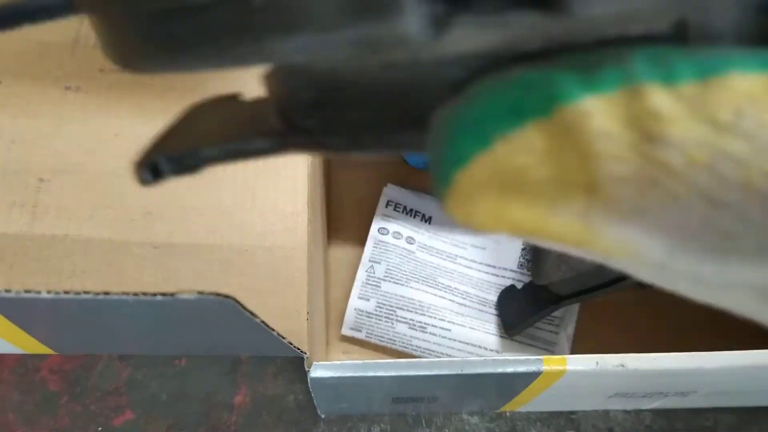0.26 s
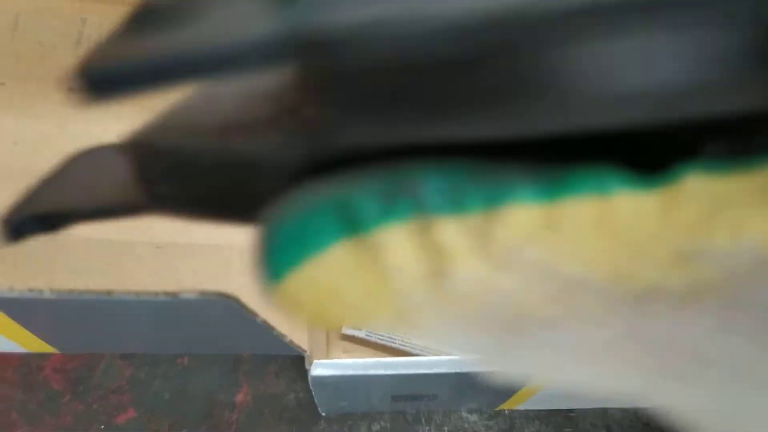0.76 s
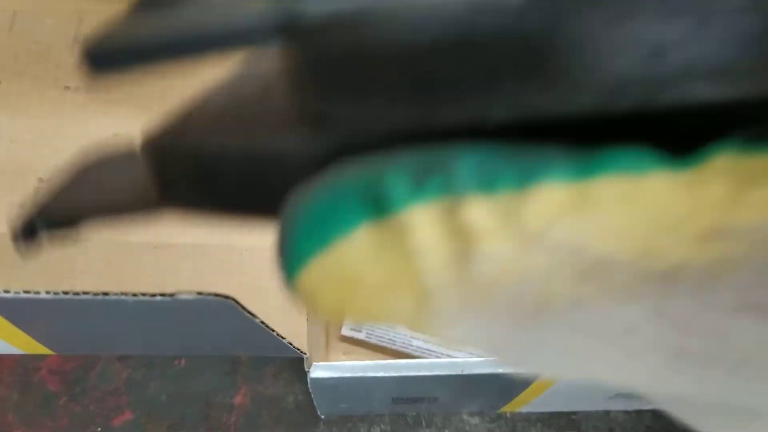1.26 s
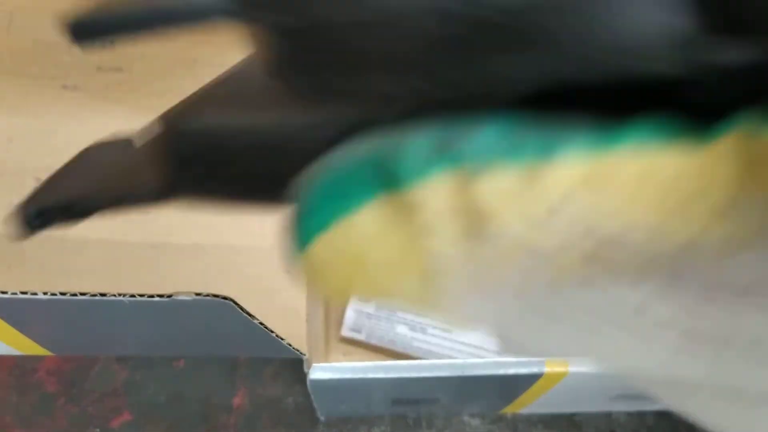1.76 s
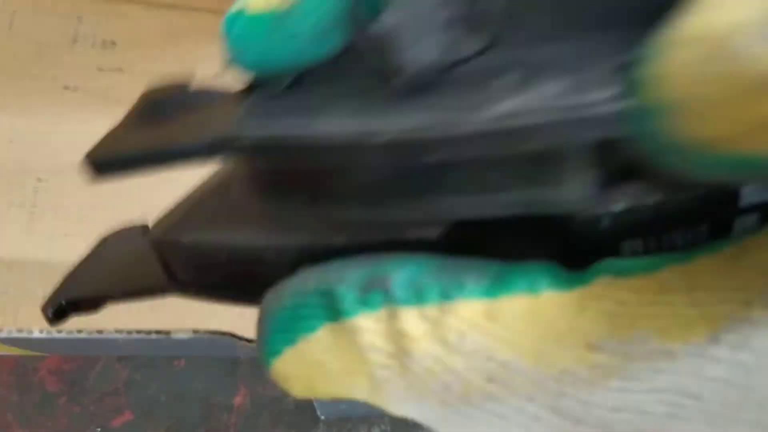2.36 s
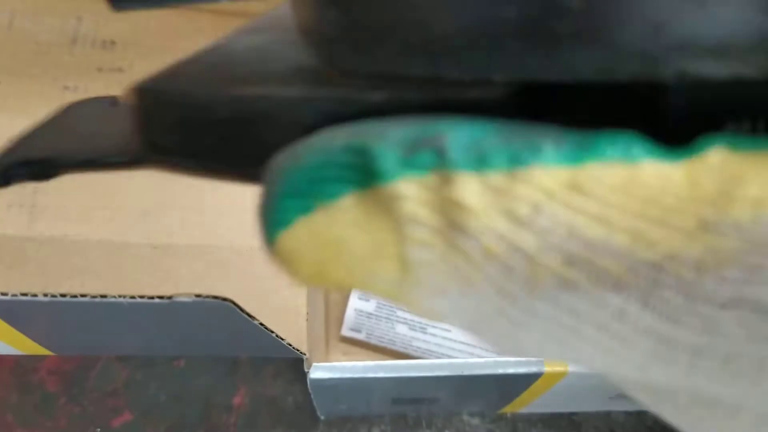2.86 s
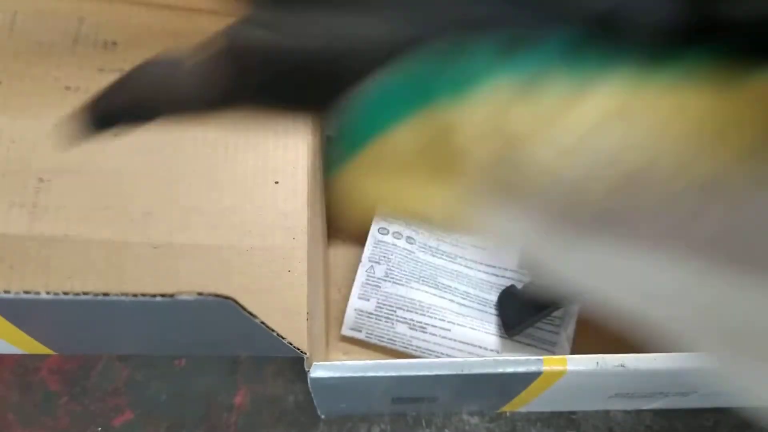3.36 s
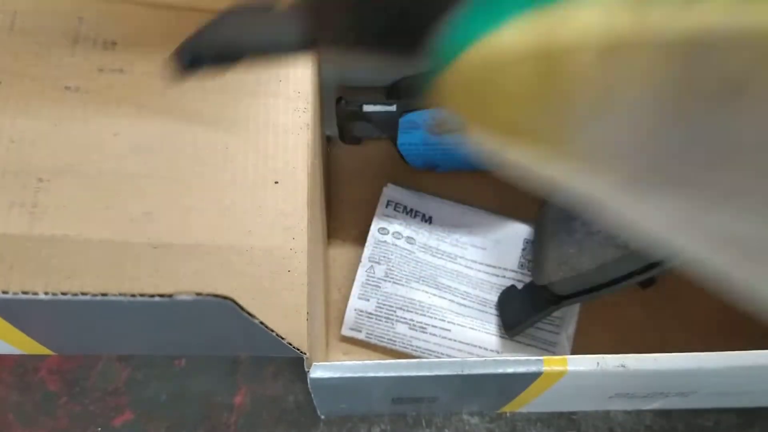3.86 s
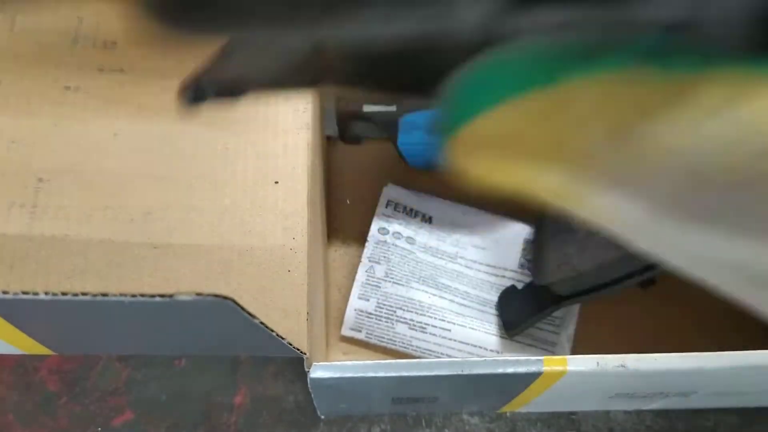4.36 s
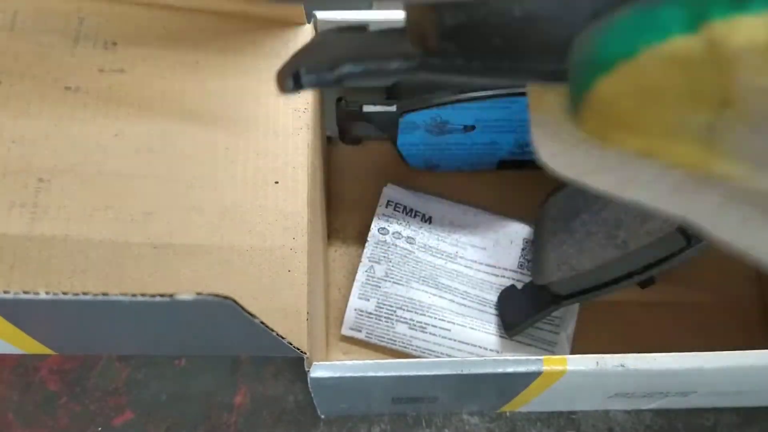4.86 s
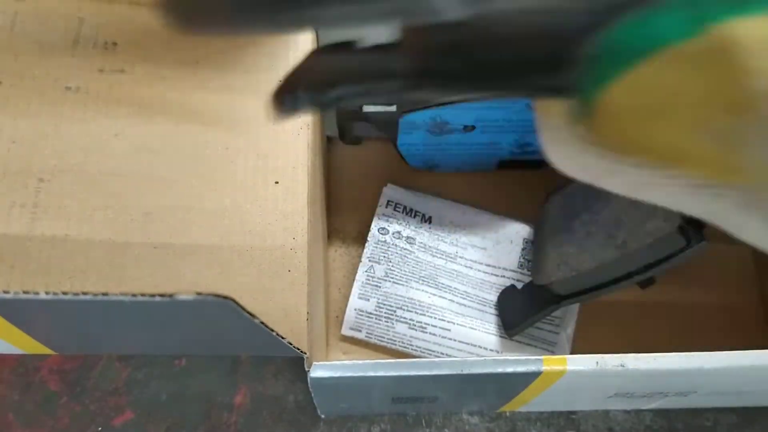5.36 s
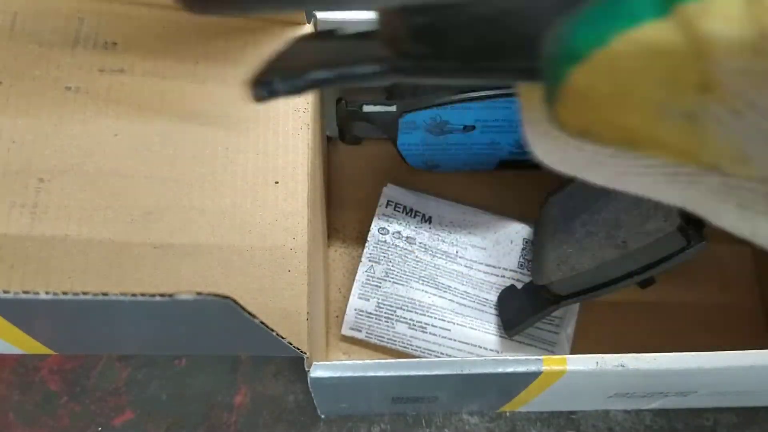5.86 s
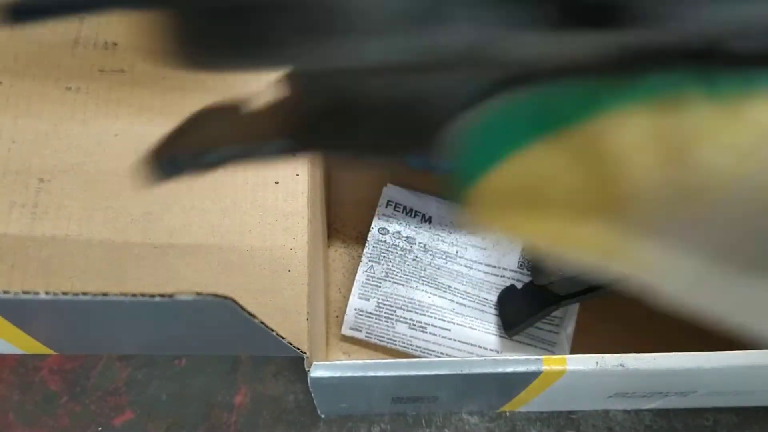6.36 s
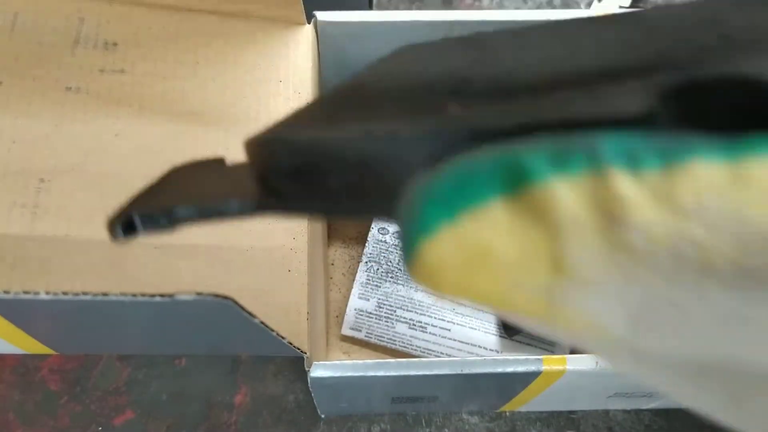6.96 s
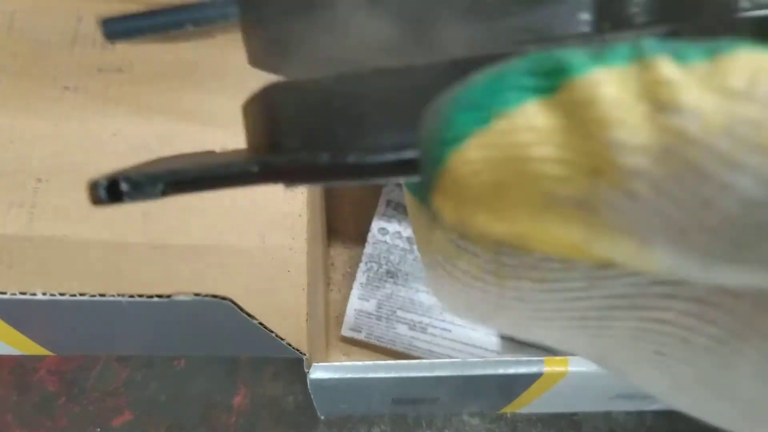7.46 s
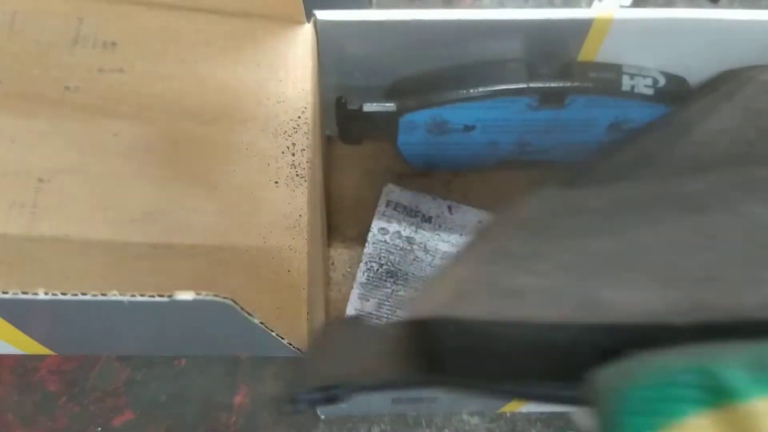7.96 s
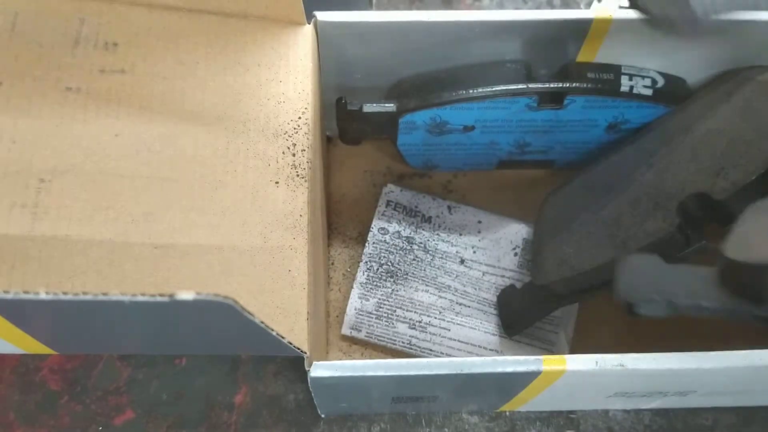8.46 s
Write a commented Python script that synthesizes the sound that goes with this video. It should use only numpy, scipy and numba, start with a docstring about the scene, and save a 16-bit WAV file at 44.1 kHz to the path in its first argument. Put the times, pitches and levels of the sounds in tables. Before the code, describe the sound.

In a quiet, hard-walled workshop, a dry, rapid scraping runs in a steady rhythm as two brake pads are ground against each other right by the microphone. After about fifty strokes it weakens and stops. The pads then clack together three times, each hit sharp and crunchy with a brief ring and a little room echo. Gloves rustle softly with a few small ticks at the end, over faint room noise.

```python
"""Over the air of a hard-walled workshop and distant engine drones, two brake pads are rubbed face to
face close to a pair of microphone ports; friction drives their resonances in quick strokes. At 2.4 s a
brushed cardboard box groans by stick-slip, and at 5.9 s a thin whine sets in. The rubbing ends, gloves
rustle and tick, and from 7 s the pads are knocked together three times to shake the dust off: impacts
excite their modes, the room reverberates, a limiter holds the peaks down. Last, the gloves rustle again."""
import sys
import numpy as np
from scipy import signal
from scipy.fft import rfft, irfft
from scipy.io import wavfile
from numba import njit

SR = 44100
rng = np.random.default_rng(int(sys.argv[2]) if len(sys.argv) > 2 else 0)


def store_pcm(level_fs):
    """Save levels as 16-bit WAV."""
    pcm = np.round(np.clip(level_fs, -1, 1) * 32767).astype(np.int16)
    wavfile.write(sys.argv[1], SR, np.atleast_2d(pcm).T)


N = 383211
RIGHT_LEAD_S = 0.000103   # sound from the pads reaches the right port first


def from_db(db):
    """Amplitude ratio of a level in dB."""
    return 10 ** (np.asarray(db) / 20)


def rms_one(x):
    """Normalisation to rms 1."""
    return x / np.sqrt(np.mean(x ** 2) + 1e-20)


def envelope(rows):
    """Linear interpolation of (time, level) rows, and a gate that fades out beyond their ends."""
    times, levels_db = np.transpose(rows)
    t = np.arange(N) / SR
    gate = np.clip(np.minimum(t - times[0], times[-1] - t) / 0.02163 + 1, 0, 1)
    return np.interp(t, times, levels_db), gate


def coloured(x, points):
    """Spectral shaping by (frequency, level) points; rms 1."""
    hz, db = np.transpose(points)
    log_hz = np.log(np.arange(N // 2 + 1) * SR / N + 1)
    return rms_one(irfft(rfft(x) * from_db(np.interp(log_hz, np.log(hz), db)), N))


def resonance(x, hz, width_hz):
    """Two-pole resonator with unit peak gain."""
    r = np.exp(-np.pi * width_hz / SR)
    poles = [1, -2 * r * np.cos(2 * np.pi * hz / SR), r * r]
    return signal.lfilter((1 - r * r) / 2 * np.array([1, 0, -1]), poles, x)


@njit
def sliding_resonance(x, hz, width_hz):
    """Two-pole resonator with a time-varying centre frequency."""
    r = np.exp(-np.pi * width_hz / SR)
    y = np.zeros_like(x)
    for i in range(2, x.shape[1]):
        pull = 2 * r * np.cos(2 * np.pi / SR * hz[i])
        for c in range(x.shape[0]):
            y[c, i] = (1 - r * r) / 2 * (x[c, i] - x[c, i - 2]) + pull * y[c, i - 1] - r * r * y[c, i - 2]
    return y


def band(x, low_hz, high_hz):
    """Band-pass filter."""
    return signal.sosfilt(signal.butter(2, [low_hz, high_hz], "band", fs=SR, output="sos"), x)


def grit(per_s, spread_db, channels):
    """Shot noise: random contacts of uneven size; rms 1."""
    size = from_db(spread_db * np.minimum(rng.exponential(1, (channels, N)), 4))
    sign = rng.choice([-1, 1], (channels, N))
    return rms_one(size * sign * (rng.random((channels, N)) < per_s / SR) + 1e-9)


def drift(corner_hz):
    """Low-pass noise of rms 1, drawn at every 16th sample."""
    r = np.exp(-2 * np.pi * corner_hz * 16 / SR)
    slow = rms_one(signal.lfilter([1], [1, -2 * r, r * r], rng.standard_normal(N // 16 + 2)))
    return np.interp(np.arange(N) / 16, np.arange(len(slow)), slow)


def flutter(corner_hz, depth_db):
    """Gain for random amplitude modulation."""
    return from_db(depth_db * drift(corner_hz))


def sides(pan_db):
    """Port gains for a level difference, left over right."""
    return from_db(np.array([[.5], [-.5]]) * pan_db)


# Spectrum of the workshop air: (frequency [Hz], relative spectral level [dB])
AIR_SPECTRUM = [(18, 1), (45, -8.5), (90, -15.5), (175, -9), (300, -13.5), (700, -22), (1500, -24.5),
                (4000, -30.5), (9000, -29), (16000, -52.5)]


def workshop_air():
    """Ambient noise, largely coherent between the ports at long wavelengths only."""
    noise = rng.standard_normal((3, N))
    common, own = noise[0], noise[1:]
    lowpass = signal.butter(1, 600, fs=SR, output="sos")
    air = signal.sosfilt(lowpass, common + 0.6 * own) + own - signal.sosfilt(lowpass, own)
    return from_db(-57) * sides(5.6) * coloured(air, AIR_SPECTRUM) * flutter(2.8, depth_db=2.0)


# Distant engines: (start [s], end [s], frequency [Hz], rms level at mid-swell [dB])
ENGINE_DRONES = [(.1, 3.1, 65, -70), (3.8, 5.7, 55.3, -64), (7.7, 8.34, 176.8, -73), (8.4, 8.9, 174.6, -63)]


def engines():
    """Amplitude-modulated tones: each drone swells, wavers and fades."""
    out, t = np.zeros(N), np.arange(N) / SR
    for start, end, hz, level_db in ENGINE_DRONES:
        swell = from_db(level_db) * np.sin(np.pi * np.clip((t - start) / (end - start), 0, 1))
        out += swell * flutter(6, depth_db=3.0) * np.sqrt(2) * np.sin(2 * np.pi * hz * t)
    return out


def whine(hz=700, level_db=-73.5, start_s=5.9, rise_s=0.12):
    """A faint pure tone, slightly modulated in amplitude, sets in late and stays."""
    t = np.arange(N) / SR
    onset = from_db(level_db) * np.clip((t - start_s) / rise_s, 0, 1)
    return onset * flutter(3, depth_db=1) * np.sqrt(2) * np.sin(2 * np.pi * hz * t)


# Reverberation bands, each ending at the next row: (lower edge [Hz], T60 [s], relative level [dB])
ROOM_BANDS = [(98, 0.25, -2), (710, 0.53, -3), (1980, 0.58, -9.5), (2750, 0.51, -1), (5160, 0.42, 0.5),
              (9330, 0.12, -10.5), (16110, .15, -8)]


def room(x, far_wall_s=0.15, spread_s=0.035, far_wall_db=4.0):
    """Diffuse reverberation decays exponentially by band; the far wall's reflection adds a late swell."""
    t, tail = np.arange(SR) / SR, 0
    for (low, t60, db), (high, *_) in zip(ROOM_BANDS, ROOM_BANDS[1:]):
        tail = tail + band(rng.standard_normal((2, SR)), low, high) * from_db(db - 60 * t / t60)
    build_up = 1 - np.exp(-(t / 0.002) ** 2)
    tail *= build_up * from_db(far_wall_db * np.exp(-((t - far_wall_s) / spread_s) ** 2))
    return signal.fftconvolve(x, tail / np.sqrt(np.sum(tail ** 2) / 2), axes=1)[:, :N]


# Envelope of the brush against the box: (time [s], level [dB])
BOX_ENVELOPE = [(2.345, -61), (2.365, -37), (2.395, -32.5), (2.41, -39), (2.43, -41.5), (2.47, -45),
                (2.5, -58)]
# Cardboard modes: (frequency [Hz], bandwidth [Hz], relative level [dB])
BOX_MODES = [(210, 27, -8), (400, 47, -1)]


def box():
    """Stick-slip excitation: uneven slips set two hollow cardboard modes groaning."""
    level_db, gate = envelope(BOX_ENVELOPE)
    slips = grit(per_s=920, spread_db=3.5, channels=2)
    slips[1] = 0.97 * slips[0] + 0.75 * slips[1]   # partly coherent at the two ports
    groan = sum(from_db(db) * rms_one(resonance(resonance(slips, hz, width), hz, 3 * width))
                for hz, width, db in BOX_MODES)
    return gate * from_db(level_db) * sides(7.0) * groan


# Glove movements, one envelope each: (time [s], level [dB])
RUSTLE_ENVELOPES = [
    [(6.74, -52), (6.8, -77), (6.87, -63), (6.93, -65), (7.01, -56)],
    [(7.95, -68), (8.06, -64), (8.12, -57.5), (8.2, -58), (8.3, -68), (8.42, -55.5), (8.48, -50),
     (8.53, -56), (8.6, -72), (8.69, -61)],
]
# Spectrum of the cloth: (frequency [Hz], relative spectral level [dB])
RUSTLE_SPECTRUM = [(1180, -58), (2000, -13), (3610, -9.5), (4300, -3.5), (4820, -20.5), (9170, -2.5),
                   (14700, -23), (16000, -35)]


def glove_rustle():
    """Cloth friction: many tiny contacts merge into shot noise."""
    cloth = grit(per_s=5100, spread_db=1.5, channels=2) * flutter(26, depth_db=2.5)
    hiss = coloured(cloth, RUSTLE_SPECTRUM)
    body = from_db(-9.0) * rms_one(band(cloth, 860, 1460)) * sides(7.7)
    movement = sum(gate * from_db(level_db) for level_db, gate in map(envelope, RUSTLE_ENVELOPES))
    return movement * (hiss + body)


# Ticks of glove and grit: (time [s], level [dB], frequency [Hz], thud relative to tick [dB])
GLOVE_TICKS = [(2.375, -43, 3400, -8), (6.804, -46, 8990, -9), (6.811, -41, 3450, 3), (6.838, -43, 3320, 0),
               (6.938, -41, 9180, -17), (7.237, -46, 10000, -21), (8.028, -52, 4640, -17),
               (8.141, -46, 4210, -21), (8.188, -42, 3860, -8), (8.477, -45, 9230, -12),
               (8.583, -42, 9390, -26)]


def glove_ticks():
    """Damped transients: a bright snap over a hollow thud that decays more slowly."""
    out, t = np.zeros((2, N)), np.arange(900) / SR
    for start, level_db, hz, thud_db in GLOVE_TICKS:
        noise = band(rng.standard_normal((2, len(t))), hz / 2, 1.35 * hz)
        snap = (np.sin(2 * np.pi * hz * t) + 1.4 * noise) * np.exp(-t / 0.0016)
        thud = rms_one(band(rng.standard_normal(len(t)), 380, 680)) * np.exp(-t / 0.0069)
        at = round(start * SR)
        out[:, at:at + len(t)] += from_db(level_db) * sides(3.6) * (snap + from_db(thud_db) * thud)
    return out


# Air pushed out between the faces: (time [s], left level [dB], right level [dB], rise time [s])
AIR_PUFFS = [(7.028, -12, -17, .014), (7.438, -22, -37, .013), (7.692, -34, -46, .012)]


def puffs(swing_hz=2.1, decay_s=0.12):
    """Air flow sucks at the ports; the membrane swings back slowly as a damped oscillator."""
    suction, t = np.zeros((2, N)), np.arange(N) / SR
    for start, left_db, right_db, rise_s in AIR_PUFFS:
        age = np.clip((t - start) / rise_s, 0, None)
        suction -= from_db([[left_db], [right_db]]) * age ** 2 * np.exp(2 - 2 * age)
    r = np.exp(-1 / (decay_s * SR))
    membrane = signal.lfilter([1, -2, 1], [1, -2 * r * np.cos(2 * np.pi * swing_hz / SR), r * r], suction)
    gust = rms_one(band(rng.standard_normal(N), 170, 380))
    return membrane + from_db(-16) * gust * suction * sides(12.0)


# Modes of the loose pads: (frequency [Hz], T60 [s])
FREE_MODES = [(390, 0.033), (640, 0.027), (1150, 0.013), (1830, 0.055), (1950, 0.11), (2260, 0.018),
              (2820, 0.015), (3520, .03), (4490, 0.02), (6700, .025), (8400, 0.018)]
# Spot struck by each knock: (level of each mode in turn [dB], ..., crunch level [dB])
STRIKE_SPOTS = [(-10, -5, -3, 2, -5, 7.5, 7, -4, -2, -14, -10, 21),
                (-26, -35.5, -21, -13, -1, -3, -2, -2, -12, -17, -28, 13.7),
                (-28, -25, -6, 2.5, -25, -11.5, 0.5, -4, -2, -14, -29, 8)]
# Rattle within the knocks: (time [s], knock index, strength [dB], contact time [s], snap level [dB])
CONTACTS = [(7.0245, 0, -16, .00003, -3), (7.0256, 0, -9, .00003, 3), (7.0286, 0, -13, .00008, -3),
            (7.0316, 0, -21, .00006, -12), (7.0362, 0, -27, .00002, -16), (7.4343, 1, -21, .00002, -10),
            (7.4352, 1, -9, .00003, 6), (7.4374, 1, -13, .00004, 5), (7.6851, 2, -3, .00012, -16),
            (7.6883, 2, -2, .00008, -5), (7.6931, 2, -5, .00004, -6), (7.7045, 2, -21, .00003, -28)]


def knocks(snap_s=0.00007):
    """Impacts excite free vibration; longer contacts stir the highs less. One stereo signal per knock."""
    out, t = np.zeros((len(STRIKE_SPOTS), 2, N)), np.arange(4096) / SR
    age = np.clip(t - [[RIGHT_LEAD_S], [0]], 0, None)
    pressure_snap = age / snap_s * (2 - age / snap_s) * np.exp(-age / snap_s)
    for start, knock, strength_db, contact_s, snap_db in CONTACTS:
        *levels_db, crunch_db = STRIKE_SPOTS[knock]
        ring = sum((-1) ** k * from_db(level_db - 60 * age / t60) * np.sin(2 * np.pi * hz * age)
                   for k, ((hz, t60), level_db) in enumerate(zip(FREE_MODES, levels_db)))
        grains = rng.standard_normal((2, len(t))) * np.exp(-t / 0.0025)
        settling = 0.33 * np.exp(-t / 0.01) * band(rng.standard_normal((2, len(t))), 1800, 9000)
        # crushed grit rings the touching faces, at twice their bandwidth in rubbing
        crunch = sum((-1) ** k * from_db(max(db)) * resonance(grains + settling, hz, 2 * width)
                     for k, (hz, width, *db) in enumerate(PRESSED_MODES))
        r = np.exp(-1 / (contact_s * SR))   # the contact time acts as a low-pass
        ring = signal.lfilter([(1 - r) ** 2], [1, -2 * r, r * r], ring)
        crunch = from_db(crunch_db) * signal.lfilter([1 - r], [1, -r], crunch)
        impact = from_db(strength_db) * (ring + crunch) + from_db(snap_db) * pressure_snap
        at = round(start * SR)
        out[knock, :, at:at + len(t)] += impact
    return out


# Rubbing strokes: (start [s], duration [s], relative level [dB], swell from start to end [dB])
PAD_STROKES = [(0.025, 0.11, -35.5, 6.5), (0.178, 0.094, -34.5, 1), (0.324, 0.098, -37, 6),
               (0.468, 0.1, -34.5, 0), (0.61, 0.11, -34, 2), (0.766, 0.097, -32.5, 0),
               (0.899, 0.1, -34.5, 6), (1.044, 0.1, -31, 0), (1.173, 0.11, -34, 3.5),
               (1.319, 0.088, -34.5, -2), (1.453, 0.088, -36, 1), (1.585, 0.087, -36, -4),
               (1.717, 0.092, -36, 1), (1.848, 0.09, -34.5, 2), (1.984, 0.096, -36.5, 1),
               (2.122, 0.091, -35.5, 0), (2.257, 0.11, -38, 1), (2.387, 0.097, -37, -1),
               (2.526, 0.087, -38, 4), (2.657, 0.092, -37, -3), (2.789, 0.092, -36.5, 2),
               (2.92, 0.094, -34, -3), (3.053, 0.1, -35.5, 2), (3.188, 0.1, -33, -1),
               (3.314, 0.096, -34, 4), (3.453, 0.089, -34, -1), (3.578, 0.089, -34.5, 2),
               (3.708, 0.097, -33, -2), (3.833, 0.092, -33.5, 2), (3.967, 0.095, -35, -0.5),
               (4.093, 0.097, -35, 3), (4.235, 0.085, -33, 2), (4.371, 0.089, -37, 4),
               (4.501, 0.084, -35.5, 4), (4.62, 0.096, -34.5, 1), (4.752, 0.096, -32.5, 0),
               (4.881, 0.1, -35, 2), (5.018, 0.098, -32.5, -3), (5.148, 0.1, -34, 0),
               (5.282, 0.095, -33, 0.5), (5.403, 0.097, -34, 5), (5.536, 0.098, -33, -0.5),
               (5.667, 0.089, -35, 3), (5.795, 0.089, -34.5, 2), (5.921, 0.099, -35, 4),
               (6.052, 0.096, -35, 1), (6.186, 0.093, -36.5, 3), (6.318, 0.1, -33.5, -1),
               (6.445, 0.12, -36.5, -4), (6.591, 0.15, -41.5, -8)]


def stroke_forces(lead_in_s=0.013, run_out_s=0.006, dulling_db_per_s=0.69):
    """Friction noise follows sliding speed; gathering dust tilts it from treble to bass."""
    bass, treble, t = np.zeros(N), np.zeros(N), np.arange(N) / SR
    for start, length, level_db, swell_db in PAD_STROKES:
        progress = np.clip((t - start + lead_in_s) / (lead_in_s + length + run_out_s), 0, 1)
        arch = np.sin(np.pi * progress)
        speed = arch ** 0.96 * from_db(level_db + swell_db * (progress - .5))
        tilt_db = dulling_db_per_s * start
        bass += speed * from_db(tilt_db / 2)
        treble += speed * arch ** 0.28 * from_db(-tilt_db / 2)
    last_stroke = t > PAD_STROKES[-1][0] - lead_in_s
    return bass, treble, last_stroke


# Modes of the pads pressed together: (frequency [Hz], bandwidth [Hz], left gain [dB], right gain [dB])
PRESSED_MODES = [(661, 216, -43.5, -12.5), (873, 187, 1, -0.5), (1018, 300, 2, -1.5), (1284, 224, 1, -4.5),
                 (1793, 163, -2.5, -4), (2096.2, 330, 0, 2), (2194, 300, -45.5, -29),
                 (2912, 230, -4.5, -20), (3706, 310, -8, -4.5), (4554, 156, -6.5, -5),
                 (5700, 670, -35, -16), (6780, 384, -6.5, -5), (7500, 970, -17.5, -8),
                 (8730, 1440, -12.5, -7.5), (10610, 1440, -15.5, -17.5), (13860, 2800, -37, -42.5)]


def rubbing(crossover_hz=2120, wander_hz=45, slack_ratio=0.78, slack_db=-4, scrape_db=14):
    """Forced vibration: catching grains drive the modes of the pads; the hands also shake the ports."""
    bass, treble, last_stroke = stroke_forces()
    common, left, right = grit(per_s=5000, spread_db=2.5, channels=3) * flutter(42, depth_db=0.5)
    common += from_db(-9.5) * grit(per_s=220, spread_db=2.5, channels=1)[0]   # a few coarse grains
    coherent = np.array([np.roll(common, round(RIGHT_LEAD_S * SR)), common])
    scrape = np.zeros((2, N))
    for k, (hz, width, left_db, right_db) in enumerate(PRESSED_MODES):
        coherence = 1 / (1 + (hz / crossover_hz) ** 4)   # long waves reach both ports alike
        grains = np.sqrt(coherence) * coherent + np.sqrt(1 - coherence) * np.array([left, right])
        force = treble if hz > crossover_hz else bass
        force = force * flutter(11.1, depth_db=1.21)   # the contact patch wanders over the pad
        centre_hz = hz + wander_hz * drift(9.0)   # the faces overlap more or less
        if hz < 1500:   # the grip slackens at the end: low modes sink and weaken
            centre_hz *= slack_ratio ** last_stroke
            force *= from_db(slack_db * last_stroke)
        ring = sliding_resonance(grains * force + 1e-18, centre_hz, width)
        scrape += (-1) ** k * from_db([[left_db], [right_db]]) * ring
    shake = rms_one(band(rng.standard_normal((2, N)), 225, 450)) * np.sqrt(bass)
    return from_db(scrape_db) * scrape + from_db([[-39], [-54.5]]) * shake


def scene(rub_room_db=-19, knock_room_db=(-11, -12.5, -17.5)):
    """Superposition of all sources; each knock, at its own distance, has its own share of room sound."""
    rub, blows = rubbing(), knocks()
    knocks_to_room = sum(from_db(db) * blow for db, blow in zip(knock_room_db, blows))
    reverberation = room(from_db(rub_room_db) * rub + knocks_to_room)
    pads = rub + blows.sum(axis=0) + reverberation + puffs()
    return pads + glove_rustle() + glove_ticks() + box() + workshop_air() + engines() + whine()


def record(dry, threshold_db=-21.5, release_db_per_s=115, slope=0.15, smoothing_s=0.0087):
    """Dynamic range compression: a gentle limiter ducks after peaks; soft clipping and a low-pass follow."""
    fall_db = release_db_per_s * np.arange(N) / SR
    level_db = 20 * np.log10(np.abs(dry).max(axis=0) + 1e-9)
    peak_db = np.maximum.accumulate(level_db + fall_db) - fall_db
    over_db = np.maximum(peak_db - threshold_db, 0)
    r = np.exp(-1 / (smoothing_s * SR))
    held = dry * from_db(-slope * signal.lfilter([1 - r], [1, -r], over_db))
    rounded = .88 * np.tanh(held / .88)
    return signal.sosfilt(signal.cheby2(12, 70, 16536, fs=SR, output="sos"), rounded)


dry = scene()
out = record(dry)
store_pcm(out)
```